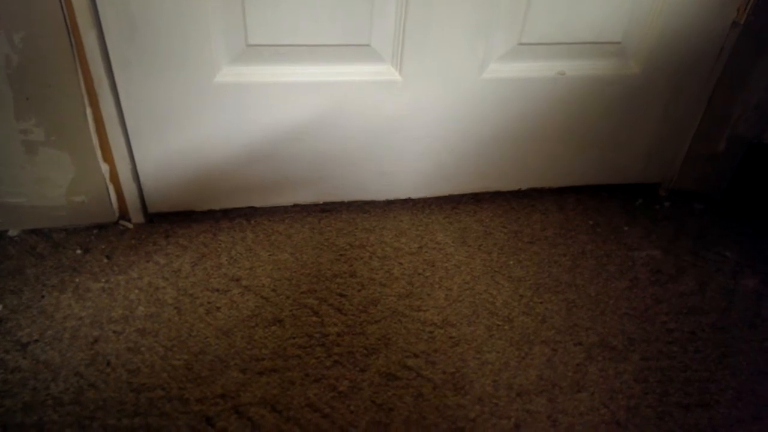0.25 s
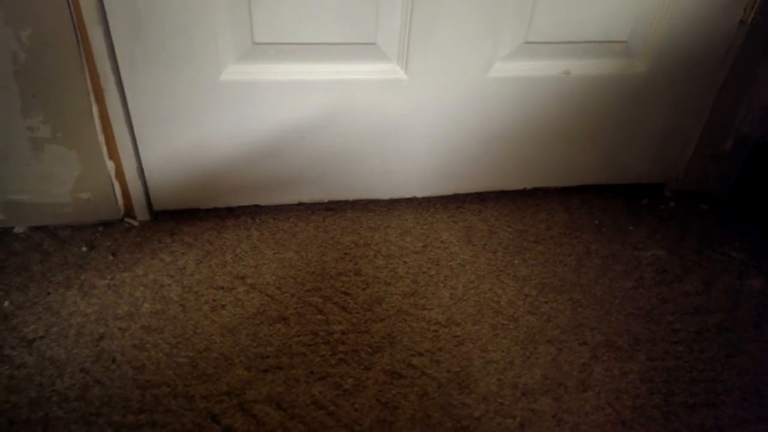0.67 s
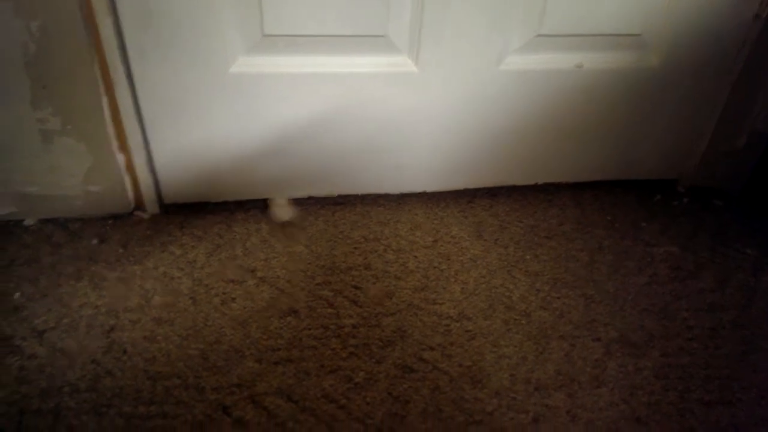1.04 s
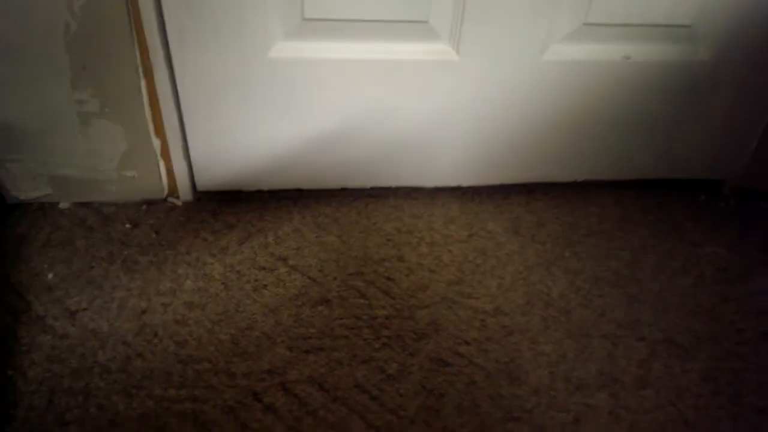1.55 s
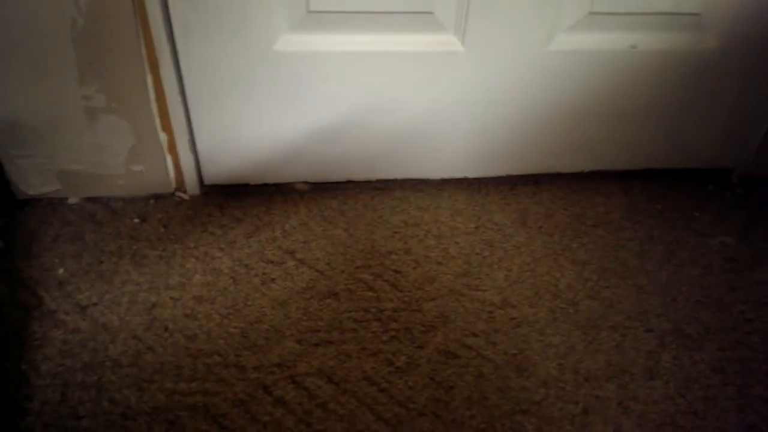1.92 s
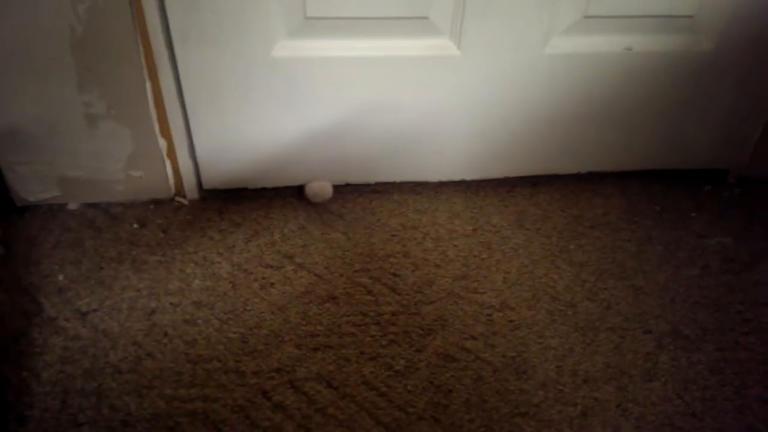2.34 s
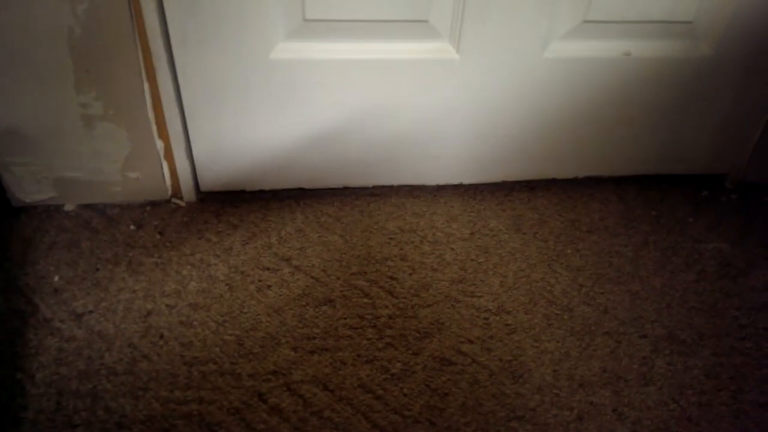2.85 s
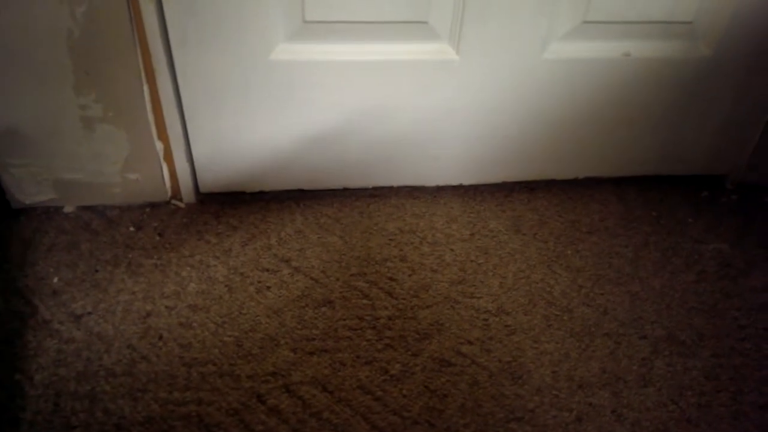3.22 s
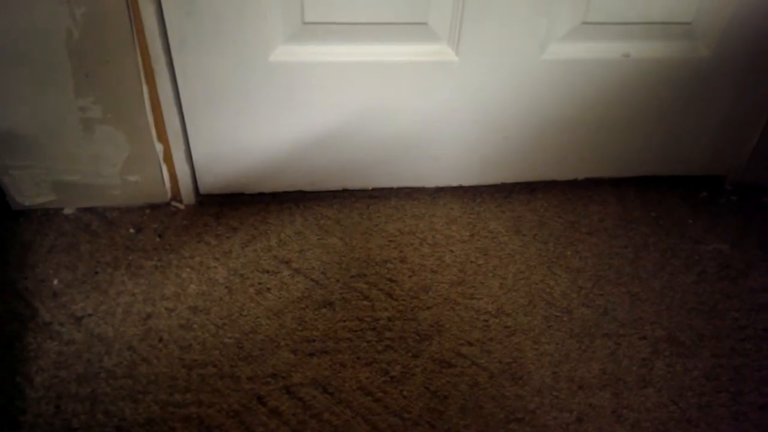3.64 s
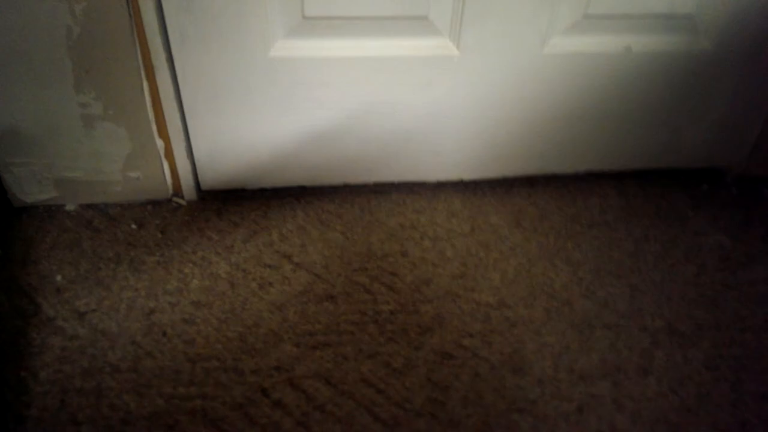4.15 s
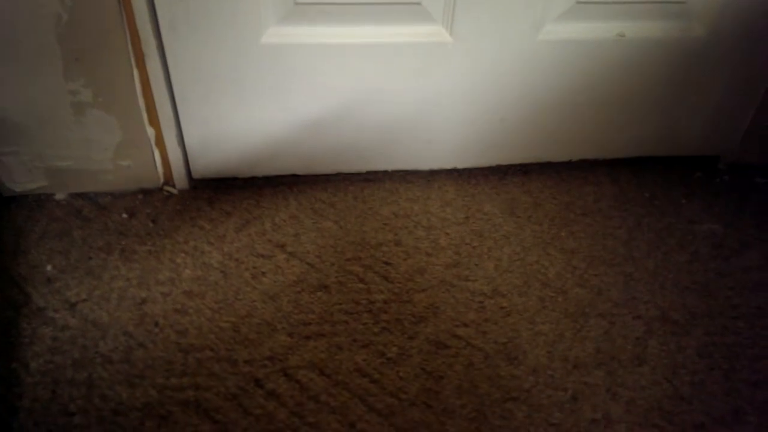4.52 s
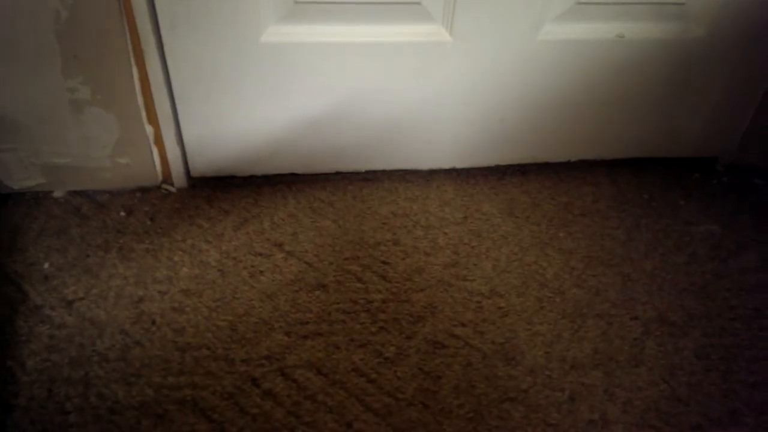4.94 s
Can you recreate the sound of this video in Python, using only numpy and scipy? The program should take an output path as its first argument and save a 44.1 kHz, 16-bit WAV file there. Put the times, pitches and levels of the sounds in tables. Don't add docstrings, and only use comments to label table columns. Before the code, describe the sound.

In a quiet carpeted home, a cat behind a closed hollow door paws at the bottom gap. Fur rustles, claws scratch, and the thin panel booms while the loose door knocks and chatters in its frame. Activity is busiest from one to three seconds, then thins out. A handheld stereo recorder picks it up close, with faint hiss, and a fingernail ticks loudly on its plastic case near the end.

```python
import sys
import numpy as np
from scipy import signal
from scipy.fft import rfft, irfft, next_fast_len
from scipy.io import wavfile
from scipy.ndimage import uniform_filter1d

SR = 44100
rng = np.random.default_rng(int(sys.argv[2]) if len(sys.argv) > 2 else 0)


def magnitude_from_level(level_db):
    exponent = np.asarray(level_db, float) / 20
    return 10 ** exponent


def wav_record(signal):
    frames = np.transpose(np.atleast_2d(signal))
    bounded = np.clip(frames, -1, 1)
    quanta = np.round(bounded * 32767).astype(np.int16)
    wavfile.write(sys.argv[1], SR, quanta)


N = 227993
PADDED = next_fast_len(N, True)
TOP_HZ = 15740

# (frequency [Hz], level per Hz [dB])
HUSH_SPECTRUM = [(20, 0), (40, -8), (138, -10.5), (248, -5.5), (328, -16), (1570, -19), (3250, -22),
                 (16000, -31)]
# (frequency [Hz], likeness [-1 to 1])
HUSH_LIKENESS = [(60, 0.4), (180, 0.7), (550, 0.56), (1650, -0.043), (4970, -0.1), (15000, -0.12)]
# (start [s], length [s], rustle at start [dB], swell to the end [dB], wood grumble [dB])
STROKES = [(0.0, .2, -71, -2, 2), (0.325, .03, -77, -4, 21), (0.399, .13, -75, -1, 5.5),
           (0.865, 0.058, -70, 0.5, 12), (0.953, 0.19, -68.5, -2, 8.5), (1.179, 0.15, -68.5, 5, 0),
           (1.377, 0.1, -60.5, -3.5, 9.5), (1.568, 0.16, -61, -4.5, 5), (1.797, 0.076, -68.5, -3, 8.5),
           (1.905, 0.038, -65.5, -2.5, 13.5), (1.985, .09, -67, 1, 6), (2.103, 0.21, -71.5, -7.5, 1),
           (2.421, 0.099, -64, 0.5, 7.5), (2.555, .12, -62.5, -5.5, 6), (2.812, 0.097, -58.5, -5, 3.5),
           (3.097, 0.091, -64, 7.5, 0), (3.265, 0.043, -60.5, 4.5, -13.5), (3.342, 0.071, -64.5, -0.5, -3),
           (3.46, 0.13, -67.5, -4.5, -1), (3.709, 0.067, -60, -5, 3.5), (3.796, 0.064, -65, 2.5, -2.5),
           (3.865, .075, -62, 3, 10), (4.088, 0.054, -68, 9.5, 14.5), (4.225, .03, -71, -5.5, 13)]
# (time [s], level [dB])
SHUDDER = [(0.0, -69), (0.3, -60), (0.56, -70.5), (0.9, -74), (0.98, -40), (1.12, -49), (1.54, -53),
           (1.71, -64), (2.04, -51.5), (2.1, -40), (2.25, -65), (2.6, -45), (2.8, -58), (3.25, -52.5),
           (3.53, -65.5), (3.83, -60.5), (4.3, -61.5), (4.55, -72)]
# (time [s], peak [dB], claw brightness [dB], edge ring [dB])
KNOCKS = [(0.146, -64, 4, -4), (0.332, -41, -38, -14), (0.348, -45, -34, -21), (0.456, -50.5, -19, -23),
          (0.862, -41.5, -22, -16), (0.881, -43.5, -24, -19), (0.997, -47, -5, -7),
          (1.06, -44.5, -3, -10.5), (1.255, -52, -12, -17), (1.389, -44.5, -4, -4.5),
          (1.431, -38.5, -19.5, -12.5), (1.572, -47, -25, -10.5), (1.719, -61.5, -9, -1.5),
          (1.803, -45, -24, -22), (1.925, -35.5, -25, -18.5), (1.957, -47, -17, -19), (1.986, -50, -8, -7),
          (2.035, -41, -14, -26), (2.053, -38, -12, -16.5), (2.249, -56, -26, -22),
          (2.441, -45.5, -10.5, -19), (2.466, -48.5, 2.5, -13), (2.581, -45, -9, -7),
          (2.596, -48.5, -13, -15), (2.663, -47.5, -11, -9), (2.779, -58, -7.5, -17),
          (2.818, -47.5, -15, -4), (2.905, -60.5, 0.5, 0.5), (3.716, -45, -19, -20),
          (4.081, -51.5, -22, -28)]
# (time [s], peak [dB], boom pitch [Hz], time to fall 60 dB [s])
PUSHES = [(0.963, -37, 60, 0.11), (0.983, -31, 80.7, 0.27), (1.059, -34.5, 111, 0.12),
          (1.096, -41.5, 72, 0.63), (1.255, -40, 90, 0.12), (1.389, -49, 82.5, 0.2),
          (1.455, -51, 61.9, 0.21), (1.509, -47.5, 96, 0.11), (1.574, -48, 71.4, 0.2),
          (1.632, -45.5, 64.3, 0.27), (1.989, -38.5, 63.4, 0.23), (2.029, -41, 96.9, 0.17),
          (2.06, -37.5, 75.6, 0.22), (2.16, -39.5, 80, 0.097), (2.208, -40, 67.6, 0.19),
          (2.443, -38, 86.4, 0.18), (2.484, -36, 105, 0.17), (2.539, -35, 81.3, 0.12),
          (2.579, -40, 77.6, 0.27), (2.816, -37.5, 85.4, 0.16), (2.878, -40.5, 70.0, 0.17),
          (3.067, -41.5, 80, 0.19), (3.13, -44.5, 62, 0.26), (3.257, -43.5, 61.6, 0.27),
          (4.25, -44, 78.1, 0.13)]
# (time [s], peak [dB], boom pitch [Hz])
NUDGES = [(0.332, -58.5, 114), (0.429, -57, 100.4), (0.482, -55, 68), (0.793, -53.5, 92),
          (0.859, -56.5, 75.4), (1.316, -50.5, 78), (1.79, -51.5, 61.6), (1.906, -54, 61), (2.658, -50, 70),
          (2.778, -57, 88), (3.407, -56.5, 70), (3.502, -61, 111.5), (4.137, -57, 104), (4.155, -53, 95),
          (4.19, -51, 105), (4.863, -60, 85.4), (4.91, -62, 100)]
# (time [s], peak [dB], pitch [Hz], time to fall 60 dB [s])
PANEL_NOTES = [(.331, -47.5, 440, 0.087), (.335, -51, 800, 0.091), (.338, -50, 1220, .05),
               (.868, -49, 800, .06), (.885, -47, 740, .07), (.972, -48.5, 363, 0.14),
               (1.255, -52, 446, 0.26), (1.392, -39.5, 828, 0.065), (1.431, -38, 786, 0.045),
               (1.575, -51, 461, 0.17), (1.802, -57, 446, .12), (1.921, -36.5, 447, 0.15),
               (1.922, -43, 735, 0.098), (1.95, -48, 454, 0.072), (2.036, -40, 366, 0.056),
               (2.047, -39, 290, 0.058), (2.821, -50, 895, .05), (3.715, -51, 418, .06),
               (3.175, -51, 447, 0.09), (3.885, -48.5, 323, 0.14), (3.9, -51, 1290, 0.066),
               (4.082, -54, 420, .05), (4.14, -47, 790, .09)]
# (time [s], peak [dB], pitch [Hz], time to fall 60 dB [s])
RAIL_SLAPS = [(.335, -54, 183, 0.16), (.862, -48.5, 166.5, 0.16), (0.965, -36, 176, 0.091),
              (1.382, -58, 196.4, 0.069), (1.92, -51.5, 186, 0.098), (2.032, -34, 190, 0.069),
              (2.048, -38, 186, 0.077), (2.445, -43.5, 187, 0.1), (2.487, -40, 184, 0.17),
              (2.779, -47, 211, 0.099), (2.795, -41.5, 225, 0.074), (3.883, -50.5, 177, 0.16),
              (3.98, -56, 183, .1), (4.218, -43, 190, .05)]
# (time [s], peak [dB], pitch [Hz])
LATCH = [
    (.885, -50, 4660),
    (.997, -41.5, 2890),
    (.997, -42.5, 3633),
    (1.062, -42, 3760),
    (1.2, -59, 3760),
    (1.925, -47, 1650),
    (2.055, -40.5, 2114),
    (2.822, -40, 1570),
    (3.115, -46.5, 2210),
]

# (frequency [Hz], width [Hz], level [dB])
PANEL_MODES = [(70, 14.3, 7.5), (106.8, 21, 2), (186, 19, -13), (29.8, 23, -5)]
WOOD_MODES = [(289, 15, -21), (374, 15, 0), (442.5, 19, -5), (482.7, 30, 3), (553, 23, -4.5), (688, 89, 0),
              (800, 95, 2.5)]
EDGE_MODES = [(983, 210, -3), (1220, 200, 0), (1424, 330, 3.5), (1650, 440, -0.5), (1883, 100, -3.5)]
CLAW_TIP_MODES = [(2950, 510, 1), (4500, 1700, 1), (7500, 3000, -20)]
# (frequency [Hz], level per Hz [dB])
CLAW_SPECTRUM = [(1180, -9), (2000, 0), (3100, -5), (3750, -3.5), (5470, -9), (7000, -25), (9100, -51),
                 (15400, -120)]
RUSTLE_SPECTRUM = [(1000, -26), (1700, -2), (2250, -2.5), (3390, -6), (4330, -6), (5720, -18.5),
                   (10000, -38), (19800, -120)]
SQUEAK_SPECTRUM = [(4000, -35), (6500, -1), (10500, 4), (13000, -6), (16000, -34)]

# (frequency [Hz], left minus right [dB])
DOOR_BALANCE = [(60, -1.5), (150, -1), (380, -2), (950, -4), (2380, -3.5), (5980, -8.5), (15000, 14)]
# (frequency [Hz], likeness [0 to 1])
DOOR_LIKENESS = [(60, 1), (400, 1), (1000, 0.5), (2500, 0.22), (5000, 0.26), (9000, 0.12)]

# (time [s], level [dB])
NAIL_CONTACTS = [
    (4.214, -21),
    (4.2151, -0.5),
    (4.216, -14.5),
    (4.2173, -14.5),
]
# (frequency [Hz], level [dB], time to fall 60 dB [s], rise [s])
CASE_LEFT = [(680, -11, .013, .0006), (1070, -3.5, 0.0044, 0.00068), (1850, -17.5, 0.0057, 0.000075),
             (4080, -28, 0.0035, 0.00025), (8000, -39, .006, 0.00011), (12500, -34, .003, .0001)]
CASE_RIGHT = [(630, -17.5, 0.014, .0003), (1450, -6.5, 0.0062, 0.00025), (1950, -13, .008, 0.00013),
              (2610, -19, .008, 0.000066), (3900, -19.5, 0.009, 0.00026), (7240, -39, 0.0047, 0.00011),
              (12300, -35, 0.0028, 0.000088)]
# (level [dB], frequency [Hz], time to fall 60 dB [s])
CASE_FLEX = (-22, 94, 0.059)
# (time [s], peak [dB])
CREAKS = [
    (4.197, -42),
    (4.329, -40),
    (4.349, -41),
    (4.414, -45.5),
]


def evened(x):
    return x / np.sqrt(np.mean(x ** 2) + 1e-20)


def read(points, hz):
    f, value = np.transpose(points)
    return np.interp(np.log(hz + 1), np.log(f + 1), value)


def curve(rows):
    s, *columns = np.transpose(rows)
    return [np.interp(np.arange(N) / SR, s, c) for c in columns]


def add(mix, s, sound):
    part = mix[..., max(round(s * SR), 0):][..., :sound.shape[-1]]
    part += sound[..., :part.shape[-1]]


def colour(x, points):
    gain = magnitude_from_level(read(points, np.fft.rfftfreq(PADDED, 1 / SR)))
    return evened(irfft(rfft(x, PADDED) * gain, PADDED)[:N])


def body(x, modes):
    t = np.arange(8192) / SR
    ring = np.zeros(len(t))
    for hz, width, db in modes:
        decay = np.exp(-np.pi * width * t)
        ring += magnitude_from_level(db) * np.sqrt(width) * decay * np.sin(2 * np.pi * hz * t)
    return signal.oaconvolve(x, ring / np.linalg.norm(ring))[:N]


def grains(per_s, spread_db):
    size = magnitude_from_level(spread_db * np.minimum(rng.exponential(1, N), 3)) * rng.standard_normal(N)
    return evened(size * (rng.random(N) < per_s / SR))


def hush():
    hz = np.fft.rfftfreq(N, 1 / SR)
    left, other = rfft(rng.standard_normal((2, N)))
    same = np.clip(read(HUSH_LIKENESS, hz), -1, 1)
    right = same * left + np.sqrt(1 - same ** 2) * other
    both = np.array([left, right]) * magnitude_from_level(read(HUSH_SPECTRUM, hz)) * (hz < TOP_HZ)
    return magnitude_from_level(-64.5) * evened(irfft(both * np.sqrt(2 / (1 + same)), N))


def drag():
    touch_s, lift_db_per_s, resting_db = 0.011, 330, -79
    force = magnitude_from_level(resting_db) * np.ones((3, N))
    for s, length, db, swell_db, grumble_db in STROKES:
        t = np.arange(0, length + .2, 1 / SR)
        swell = swell_db * np.minimum(t / length, 1)
        lift = lift_db_per_s * np.maximum(t - length, 0)
        shape = magnitude_from_level(db + swell - lift) * (1 - np.exp(-t / touch_s))
        edge_db = -4 + 0.52 * grumble_db
        add(force, s, magnitude_from_level([[0], [grumble_db], [edge_db]]) * shape)
    return force


def rubbing():
    drift = uniform_filter1d(uniform_filter1d(rng.standard_normal(N), 400), 250)
    fur, wood, edge = drag() * magnitude_from_level(1.7 * evened(drift))
    slips = grains(3000, 1.0)
    rustle = magnitude_from_level(0.5) * fur * colour(grains(9000, 1.9), RUSTLE_SPECTRUM)
    grumble = body(magnitude_from_level(-5.5) * wood * slips, WOOD_MODES) + body(magnitude_from_level(2.0) * edge * slips, EDGE_MODES)
    shudder = body(magnitude_from_level(curve(SHUDDER)[0] - 1) * grains(400, 1.3), PANEL_MODES)
    return rustle + grumble + shudder


def knocks():
    force, blows, t = np.zeros((4, N)), np.zeros((4, N)), np.arange(SR // 4) / SR
    for s, db, claw_db, edge_db in KNOCKS:
        chatter_s = max(.019 - .0004 * (db + 46.5), .002)
        squeak_db = -13.5 + claw_db
        shares = magnitude_from_level(db) * magnitude_from_level([[0], [edge_db], [claw_db], [squeak_db]])
        add(force, s, shares * np.exp(-(t / chatter_s) ** 1.5) * (1 - np.exp(-t / 0.00098)))
        add(blows, s, shares * np.hanning(12))
    slips = grains(4000, 2.2)
    wood = body(magnitude_from_level(-6.5) * force[0] * slips + magnitude_from_level(1.5) * blows[0], WOOD_MODES)
    edge = body(magnitude_from_level(6.5) * force[1] * slips + magnitude_from_level(12.0) * blows[1], EDGE_MODES)
    scrape = magnitude_from_level(1.5) * force[2] * colour(grains(6000, 3.3), CLAW_SPECTRUM)
    claw = scrape + body(magnitude_from_level(10.0) * blows[2], CLAW_TIP_MODES)
    squeak = magnitude_from_level(1.5) * force[3] * colour(grains(9000, 2.0), SQUEAK_SPECTRUM)
    return wood + edge + claw + squeak


def pushes():
    out, t = np.zeros(N), np.arange(SR // 2) / SR
    start = 1 - np.exp(-t / 0.012)
    rows = [(*row, -19) for row in PUSHES]
    rows += [(*row, 0.25, -10.5) for row in NUDGES]
    for s, db, hz, t60, upper_db in rows:
        upper_hz = 186.8 * (1 + 0.031 * rng.standard_normal())
        boom = np.sin(2 * np.pi * hz * t) * magnitude_from_level(-60 * t / t60)
        upper = np.sin(2 * np.pi * upper_hz * t) * magnitude_from_level(-60 * t / 0.187)
        add(out, s - .004, magnitude_from_level(db + 6.0) * (boom + magnitude_from_level(upper_db) * upper) * start)
    return out


def clear_tones():
    out, t = np.zeros(N), np.arange(SR // 4) / SR
    latch = [(*row, .045) for row in LATCH]
    for s, db, hz, t60 in [*PANEL_NOTES, *RAIL_SLAPS, *latch]:
        tone = magnitude_from_level(db - 60 * t / t60) * np.sin(2 * np.pi * hz * t)
        add(out, s - .002, tone * (1 - np.exp(-t / 0.00073)))
    return out


def ports(x):
    left_lead_s, turn_hz = 0.00025, 2.3
    hz, t = np.fft.rfftfreq(PADDED, 1 / SR), np.arange(3000) / SR
    same = np.clip(read(DOOR_LIKENESS, hz), 0, 1)
    tilt = magnitude_from_level(read(DOOR_BALANCE, hz) / 2)
    lead = np.array([np.exp(2j * np.pi * hz * left_lead_s), np.ones(len(hz))])
    heard = np.sqrt(same) * rfft(x, PADDED) * lead
    for k in range(3):
        scatter = rng.standard_normal((2, 3000)) * magnitude_from_level(-60 * t / 0.05)
        scatter /= np.linalg.norm(scatter[0])
        turn = np.sqrt(2 / 3) * np.cos(2 * np.pi * (turn_hz * np.arange(N) / SR + k / 3))
        heard += np.sqrt(1 - same) * rfft(x * turn, PADDED) * rfft(scatter, PADDED)
    return irfft(heard * np.array([tilt, 1 / tilt]) * (hz < TOP_HZ), PADDED)[:, :N]


def creaks():
    out, t = np.zeros((2, N)), np.arange(4000) / SR
    tones = [(350, 2.0), (800, -11.5), (1700, -16)]  # (frequency [Hz], level [dB])
    creak = sum(magnitude_from_level(db - 60 * t / 0.006) * np.sin(2 * np.pi * hz * t) for hz, db in tones)
    for s, db in CREAKS:
        add(out, s - .001, magnitude_from_level(db) * magnitude_from_level([[-6], [3]]) * creak)
    return out


def tick():
    out, t = np.zeros((2, N)), np.arange(4000) / SR
    low_cut = signal.butter(2, 520, "high", fs=SR, output="sos")
    for port, modes, lag_s in zip(out, (CASE_LEFT, CASE_RIGHT), (.00045, 0)):
        ring = np.zeros(len(t))
        for hz, db, t60, rise in modes:
            start = 1 - np.exp(-(t / max(rise, 1e-5)) ** 2)
            ring += start * magnitude_from_level(db - 60 * t / t60) * np.sin(2 * np.pi * hz * t)
        ring = signal.sosfilt(low_cut, ring)
        for s, db in NAIL_CONTACTS:
            add(port, s + lag_s, magnitude_from_level(db) * ring)
    db, hz, t60 = CASE_FLEX
    bend = -magnitude_from_level(db - 60 * t / t60) * np.sin(2 * np.pi * hz * t)
    add(out[1], 4.2167, bend)
    return out


def scene():
    door = rubbing() + knocks() + pushes() + clear_tones()
    return hush() + ports(door) + creaks() + tick()


def top_cut(x):
    return signal.sosfilt(signal.butter(12, 16420, fs=SR, output="sos"), x)


def record(dry):
    thin = signal.sosfilt(signal.butter(2, 42, "high", fs=SR, output="sos"), dry)
    return top_cut(thin + 0.00033)


dry = scene()
out = record(dry)
wav_record(out)
```